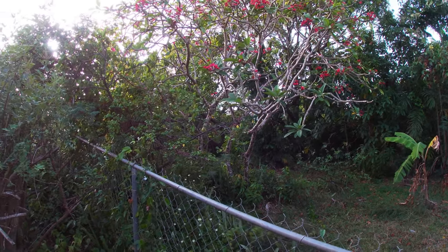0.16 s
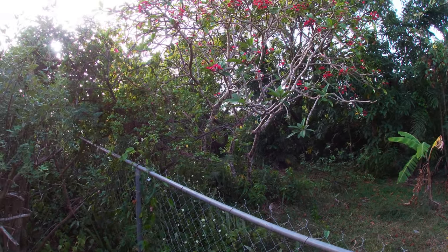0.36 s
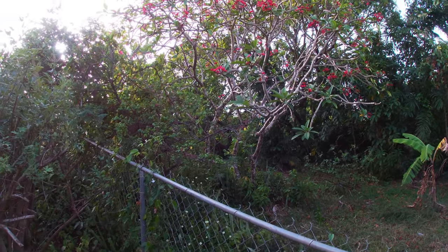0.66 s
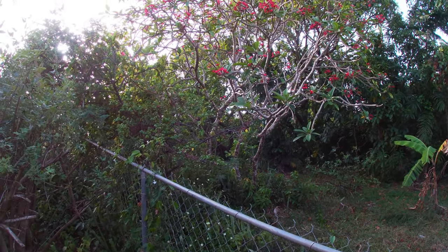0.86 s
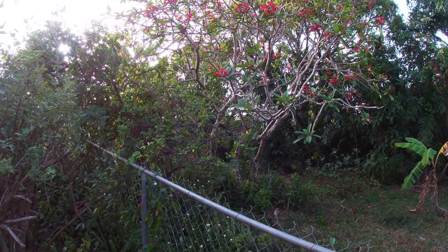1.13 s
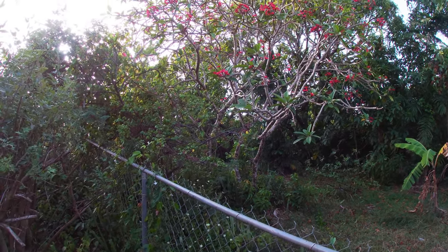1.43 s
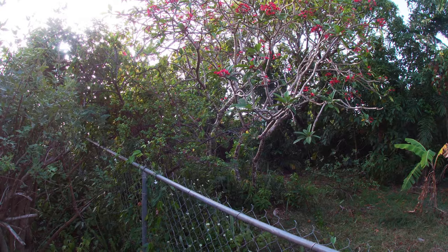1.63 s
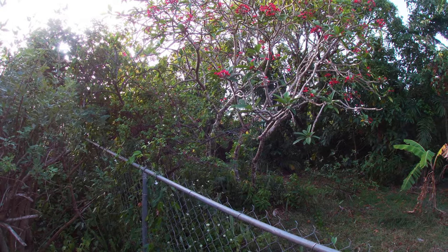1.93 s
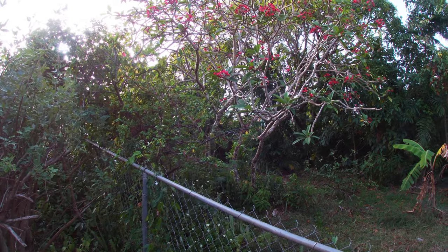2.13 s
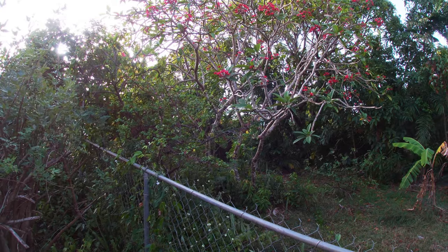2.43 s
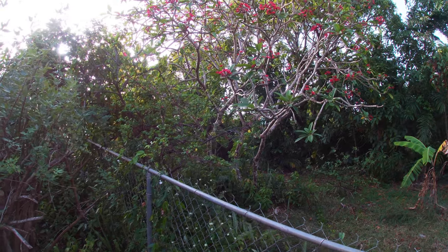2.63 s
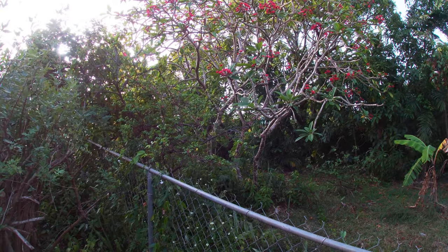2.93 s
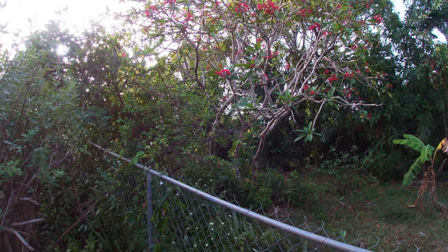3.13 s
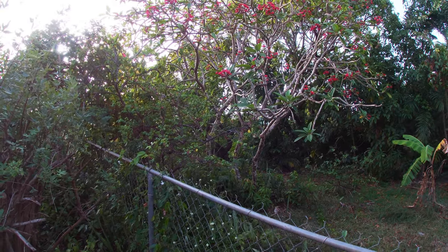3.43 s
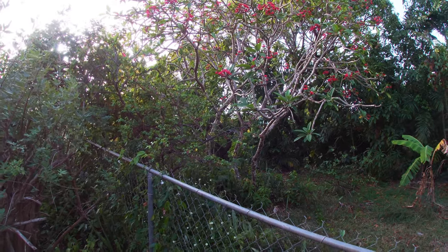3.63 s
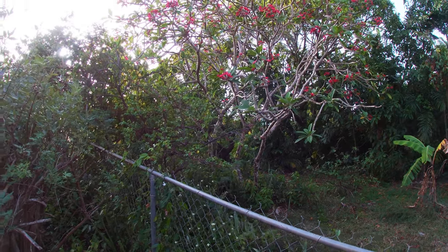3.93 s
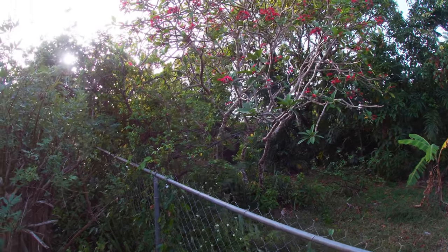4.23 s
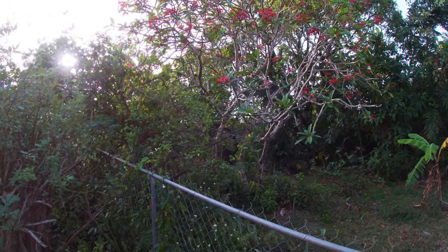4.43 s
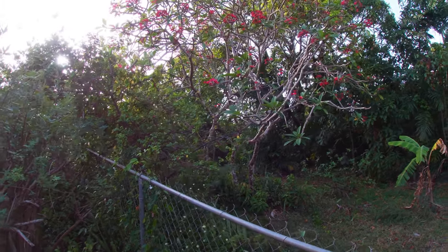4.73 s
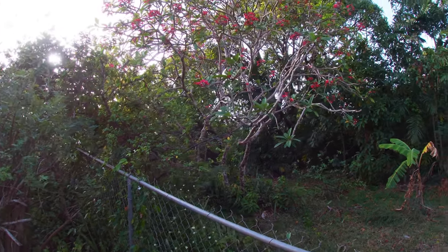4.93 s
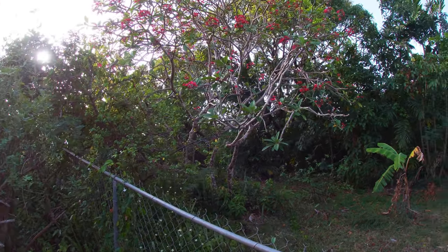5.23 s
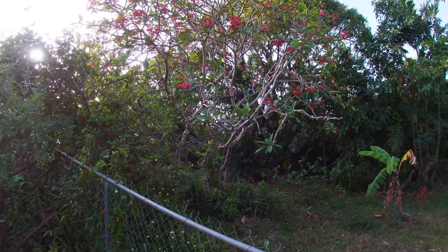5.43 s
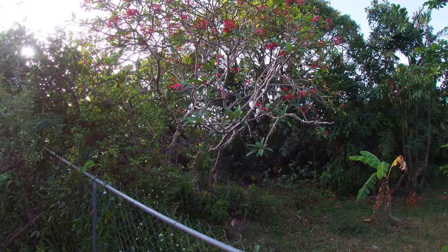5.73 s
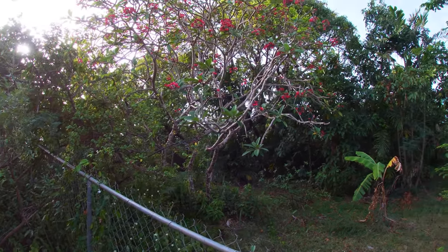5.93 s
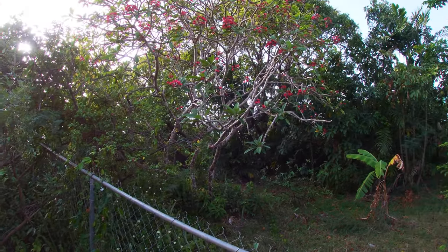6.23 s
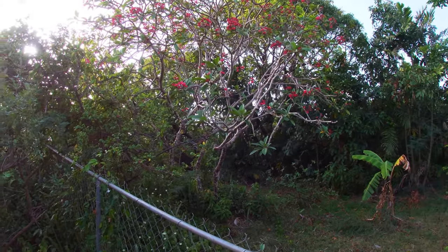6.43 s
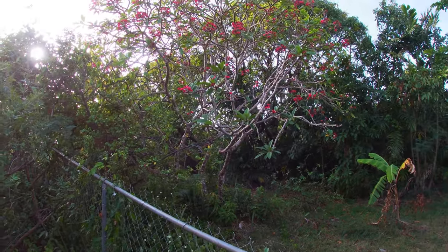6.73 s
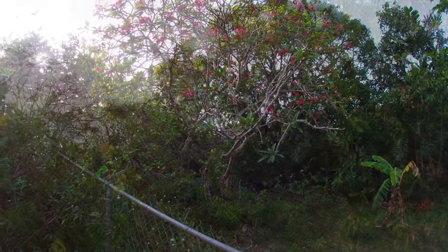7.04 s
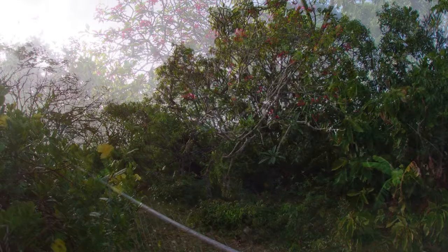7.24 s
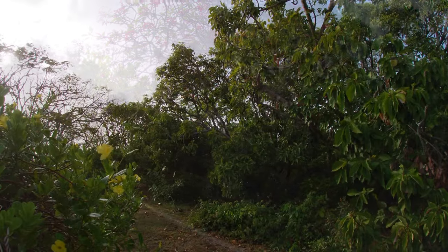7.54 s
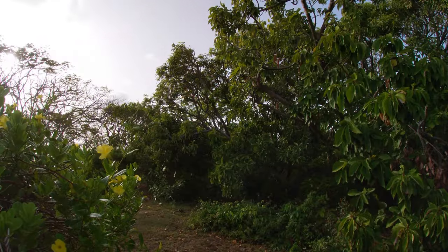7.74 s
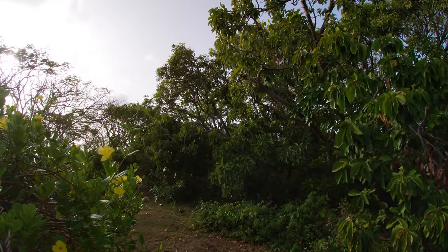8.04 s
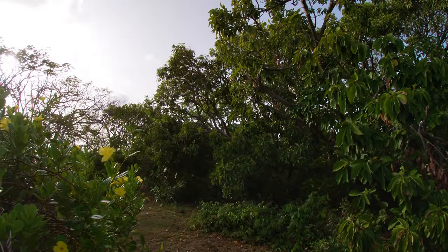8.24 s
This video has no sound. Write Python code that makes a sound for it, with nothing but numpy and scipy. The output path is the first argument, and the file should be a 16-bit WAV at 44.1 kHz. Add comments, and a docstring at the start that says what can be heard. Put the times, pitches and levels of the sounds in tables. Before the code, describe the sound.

Outdoors among trees, short raspy monkey barks come in rapid, uneven bursts with a light echo, over a quiet rush of air. Five sharp chirps from a second animal sound closer to the microphone, and a few soft low bumps lie underneath. Leaves shake and the wind swells as the scolding thins, ending with faint thin bird whistles and two far yaps.

```python
"""Over a soft outdoor rush, a monkey scolds from the trees round a garden: volleys of harsh falling barks,
pulses and rasp rung through a closing mouth, at first with hoarse gasps for air between them. A second,
nearer animal cuts in with sharp chirps, and the wall of trees throws the calls back. A few soft low bumps
sound; later shaken branches rustle and the breeze gusts. At the end a small bird whistles
faintly and the scolding thins out to two far yaps."""
import sys
import numpy as np
from scipy import signal
from scipy.fft import rfft, irfft, next_fast_len
from scipy.io import wavfile
from scipy.ndimage import uniform_filter1d, minimum_filter1d, map_coordinates

SR = 44100
rng = np.random.default_rng(int(sys.argv[2]) if len(sys.argv) > 2 else 0)


def log_audio(samples):
    """Write samples as a 16-bit WAV file to the path given in sys.argv[1]."""
    # one column per channel
    frames = np.atleast_2d(samples).T
    # limit to full scale, then quantise
    limited = np.clip(frames, -1, 1)
    pcm = np.round(limited * 32767).astype(np.int16)
    wavfile.write(sys.argv[1], SR, pcm)


N = 369116
T = np.arange(SR // 5) / SR  # time axis of one short sound, s


def amp(db):
    """Decibels to gain."""
    return 10 ** (np.asarray(db) / 20)


def unit(x):
    """Scaled to rms 1."""
    return x / np.sqrt(np.mean(x ** 2) + 1e-20)


def along(points, hz):
    """A curve of (Hz, value) points, read on a log frequency axis."""
    f, v = np.transpose(points)
    return np.interp(np.log(hz + 1), np.log(f + 1), v)


def wobble(rate, size):
    """A smooth random curve, rate knots a second."""
    return map_coordinates(rng.standard_normal(size // 20 + 4), [np.arange(size) * rate / SR], mode="mirror")


def filtered(x, response):
    """x through an EQ whose gain is a function of frequency."""
    m = next_fast_len(len(x) + 4096)
    return irfft(rfft(x, m) * response(np.fft.rfftfreq(m, 1 / SR)), m)[:len(x)]


def coloured(x, spectrum):
    """x shaped by a (Hz, dB) spectrum, at rms 1."""
    return unit(filtered(x, lambda hz: amp(along(spectrum, hz))))


def resonance(x, centre, width):
    """x through a steep-sided resonance (centre and width in Hz), at rms 1."""
    return unit(filtered(x, lambda f: (1j * f * width / (centre ** 2 - f * f + 1j * f * width)) ** 2))


def swell(length, rise, fall):
    """Envelope of one short sound: opens, holds, closes."""
    attack = np.sin(np.pi / 2 * np.clip(T / rise, 0, 1))
    release = np.cos(np.pi / 2 * np.clip((T - length) / fall + .5, 0, 1)) ** 2
    return attack * release


def surges(rows):
    """Summed power of swells that grow to a peak and die away."""
    t = np.arange(N) / SR
    return sum((amp(db) * np.exp(-np.maximum((s - t) / rise, (t - s) / fall))) ** 2
               for s, rise, fall, db in rows)


def add(track, s, sound):
    """Mix a sound into the track at time s."""
    part = track[max(round(s * SR), 0):][:len(sound)]
    part += sound[:len(part)]


def breeze_and_leaves():
    """A low rush swells in gusts; leaves rustle in tiny clumps, stirred by it or shaken with a branch."""
    # gusts of the breeze: peak_s, rise_s, fall_s, level_db
    gusts = [(0, .5, 1.2, -39.5), (6.2, 0.63, 0.27, -29.5), (7.75, 0.38, 2.2, -34.5)]
    # shaken branches: peak_s, rise_s, fall_s, level_db
    shakes = [(5.1, 0.76, 0.37, -35), (5.82, 0.17, 0.3, -25), (6.45, 0.16, 0.3, -29)]
    # colour of the rush: frequency_hz, density_db
    rush_spectrum = [(30, -13), (100, -22), (155, 0), (220, 0.5), (360, -8), (650, -5.5), (1050, -2),
                     (1300, 3), (1650, -25.5), (2300, -17.5), (3200, -25), (4200, -21), (6000, -40.5),
                     (9000, -55)]
    # colour of the leaves: frequency_hz, density_db
    leaf_spectrum = [(300, -9), (1200, 5.5), (2400, 12.5), (3500, 4), (5200, 2.5), (7000, 0.5), (8500, -9),
                     (10200, -6), (12000, -18), (14500, -28)]
    calm_db, leaf_stir_db = -38, -6.5  # the bed under the gusts; stirred leaves relative to the rush
    breeze_level = np.sqrt(amp(calm_db) ** 2 + surges(gusts))
    leaf_level = np.sqrt((amp(leaf_stir_db) * breeze_level) ** 2 + surges(shakes))
    drift = lambda rate: amp(.8 * wobble(rate, N))
    rush = breeze_level * drift(7) * coloured(rng.standard_normal(N), rush_spectrum)
    clumps = rng.standard_normal(N) * amp(1.5 * wobble(400, N))
    return rush + leaf_level * drift(8.9) * coloured(clumps, leaf_spectrum)


def thuds():
    """Soft low bumps, each a short swell of narrow-band noise."""
    # bumps: start_s, length_s, pitch_hz, level_db
    bumps = [(2.3, .06, 85, -48), (3.815, 0.046, 185, -31.5), (5.43, .04, 181, -35),
             (6.094, 0.13, 218, -42), (6.28, 0.21, 111, -43)]
    out = np.zeros(N)
    for s, length, hz, db in bumps:
        body = resonance(rng.standard_normal(len(T)), hz, 99)
        add(out, s, amp(db) * swell(length, 0.011, 0.038) * body)
    return out


def bird():
    """A small bird's thin, slightly wavering whistles, most of them arched in pitch."""
    # whistles: start_s, length_s, start_hz, middle_hz, end_hz, level_db
    whistles = [(7.13, .08, 5200, 5500, 5200, -55), (7.41, .08, 7200, 7100, 7000, -55),
                (7.555, .1, 4200, 5200, 4800, -49.5), (8.01, .1, 3800, 4700, 4500, -50)]
    out = np.zeros(N)
    for s, length, start_hz, middle_hz, end_hz, db in whistles:
        arch = np.polyfit([0, .5, 1], [start_hz, middle_hz, end_hz], 2)
        pitch = np.polyval(arch, np.clip(T / length, 0, 1)) * (1 + 0.016 * wobble(224, len(T)))
        tone = unit(np.sin(2 * np.pi * np.cumsum(pitch) / SR))
        add(out, s, amp(db) * swell(length, 0.018, 0.024) * tone)
    return out


def scatter(x, decay, delay_s):
    """Echoes from trunks and foliage, drifting smoothly from one pattern to the next."""
    out, hop = np.zeros(N), SR // 3
    fade = np.sin(np.pi * np.arange(2 * hop) / (2 * hop))
    for start in range(-hop, N, hop):
        hz, t, noise = signal.stft(rng.standard_normal(SR * 3 // 4), SR, nperseg=256)
        tail = signal.istft(noise * amp(-60 * t / along(decay, hz)[:, None]), SR, nperseg=256)[1]
        tail = tail / np.sqrt(SR * along(decay, 2000) / np.log(1e6))  # a longer tail adds no energy
        first = max(start, 0)
        part = x[first:start + 2 * hop]
        add(out, first / SR + delay_s, signal.fftconvolve(part * fade[first - start:][:len(part)], tail))
    return out


def tree_echoes(near_send, far_send):
    """A short tail from the near trees, a long one from the far trees, a slap from the garden's edge."""
    # decay among the near trees: frequency_hz, t60_s
    near_decay = [(200, 0.053), (1200, 0.23), (2300, 0.22), (8000, 0.34)]
    # decay among the far trees: frequency_hz, t60_s
    far_decay = [(200, 1), (1200, 0.84), (2300, 1), (4000, 0.2), (9000, 0.19)]
    # colour of the distinct echo from the far edge: frequency_hz, gain_db
    slap_eq = [(250, -24.5), (700, -31), (1300, -25), (2100, -12.5), (2600, -43), (6000, -28)]
    echoes = amp(-5.0) * scatter(near_send, near_decay, delay_s=.012)
    echoes += amp(-15.5) * scatter(far_send, far_decay, delay_s=.05)
    add(echoes, .142, filtered(far_send, lambda hz: amp(along(slap_eq, hz))))
    return echoes


def chirps():
    """A rough squeak drops onto the mouth resonance and ends in a gulp; a reflection doubles it."""
    # the second animal's chirps: start_s, level_db, roughness (0-1), overtone_db (relative)
    calls = [(.404, -12, .62, 0), (2.126, -12.5, .48, -7), (3.12, -10, .45, -5), (4.769, -6.5, .3, 0),
             (5.613, -10, .55, 2)]
    # hoarse part of a chirp: frequency_hz, density_db
    hoarse_spectrum = [(900, -56), (1600, -12.5), (1950, -23), (2250, 6.5), (2800, -8), (3200, -28.5),
                       (3750, -10.5), (4250, -21), (5000, -16), (5700, -31.5), (7300, -25), (10000, -57)]
    pitch = 2402 * (.97 + 0.231 * np.exp(-T / 0.00324))
    out = np.zeros(N)
    for s, db, rough, overtone_db in calls:
        treble_shelf = [(3000, 0), (3700, overtone_db)]
        for delay_s in [0, .0195]:
            phase = 2 * np.pi * np.cumsum(pitch * (1 + 0.19 * rough * wobble(1340, len(T)))) / SR
            tone = unit(np.sin(phase) + amp(-30.5) * np.sin(2 * phase))
            hoarse = coloured(rng.standard_normal(len(T)), hoarse_spectrum)
            squeak = filtered((1 - rough) * tone + rough * hoarse, lambda hz: amp(along(treble_shelf, hz)))
            add(out, s + delay_s, amp(db) * swell(.0115, .003, .009) * unit(squeak))
            gulp = swell(0.0077, 0.0063, 0.011) * resonance(rng.standard_normal(len(T)), 1307, 200)
            add(out, s + delay_s + .007, amp(db + overtone_db - 9) * gulp)
    return out


def gasps():
    """After some barks the monkey draws air through its narrowed throat: a hoarse arched hoot."""
    # in-breaths: start_s, level_db
    breaths = [(.181, -11.5), (.328, -12), (.826, -17.5), (1.008, -21.5), (1.638, -22.5), (3.634, -23)]
    length_s = 0.0308
    arch = 1 - 0.14 * (np.clip(T / length_s, 0, 1.1) - .4) ** 2
    out = np.zeros(N)
    for s, db in breaths:
        pitch = 1295 * arch * (1 + 0.0055 * wobble(360, len(T)))
        hoot = np.sin(2 * np.pi * np.cumsum(pitch) / SR)
        hoarse = .5 * resonance(rng.standard_normal(len(T)), 1240, 280)
        hoarse += 0.19 * resonance(rng.standard_normal(len(T)), 268, 210)
        add(out, s, amp(db) * swell(length_s, 0.0073, 0.024) * (hoot + hoarse))
    return out


def bark(length, start_hz, end_hz, db, harsh_db, closure, catch_s, ringing, chest_db):
    """The pitch sags and the mouth closes as the air runs out; a ringing start breaks up into rasp."""
    # colour of the rasp: frequency_hz, density_db
    rasp_spectrum = [(120, -55), (300, -36), (450, -12), (800, -4), (1100, -7.5), (1500, 0), (2000, -2),
                     (2600, 0.5), (3100, -5), (3700, -7), (4600, -16), (7000, -24.5), (10000, -41),
                     (15000, -53)]
    # lowest harmonics, the chest of the voice: multiple, level_db
    chest_harmonics = [(1, 0), (2, -3), (3, -3), (4, -33)]
    progress = np.clip(T / length, 0, 1.15)
    unsteady = 1 + .011 * wobble(504, len(T)) + .017 * wobble(70.6, len(T))  # fast jitter, slow waver
    pitch = (start_hz + (end_hz - start_hz) * progress ** 1.25) * unsteady
    phase = 2 * np.pi * np.cumsum(pitch) / SR
    pulses = unit(np.cos(np.outer(np.arange(1, 19), phase) + rng.uniform(0, np.pi, (18, 1))).sum(0))
    puffs = lambda: unit(rng.standard_normal(len(T)) * (1 + 0.27 * np.cos(phase)))  # air, once a cycle
    voice = lambda hz, width: unit(resonance(pulses, hz, width) + .45 * resonance(puffs(), hz, width))
    closing = np.pi / 2 * np.clip((progress - .3) / 0.79, 0, 1)

    def slide(hz, width, drop):
        """A resonance crossfades into a lower, wider, weaker one."""
        return np.cos(closing) * voice(hz, width) + 0.52 * np.sin(closing) * voice(hz * drop, width * 1.44)

    strain = amp(harsh_db)  # a harsher bark blurs the mouth resonance and drags it lower
    mouth = slide(2246 - 13.5 * harsh_db, width=430 * strain, drop=1 - closure * strain)
    throat = amp(harsh_db - 2.5) * slide(1192, width=250, drop=0.841)
    grit = unit(coloured(puffs(), rasp_spectrum) + 1.1 * coloured(pulses, rasp_spectrum))
    rasp = amp(harsh_db - 2.5 - 10 * ringing * np.clip(1 - progress / 0.51, 0, 1)) * grit
    chest = sum(amp(level) * np.sin(k * phase + rng.uniform(0, 2 * np.pi)) for k, level in chest_harmonics)
    push = amp(-7 * np.clip((catch_s - T) / 0.0066, 0, 1))  # catches weakly, then jumps to full strength
    upper = push * swell(length, 0.0011, 0.037) * (mouth + throat + rasp)
    return amp(db) * (upper + amp(chest_db) * swell(length, catch_s + 0.013, 0.051) * chest)


def scolding_monkey():
    """Near volleys, each bark pitched by the rest before it and the haste of the next; then far yaps."""
    # barks: start_s, length_s, level_db, harshness_db (rasp and throat against the mouth resonance)
    volleys = [(0, 0.025, -5.5, 0.5), (0.094, 0.061, -12, 0), (0.251, 0.053, -15.5, 4),
               (0.543, 0.063, -9.5, 0.5), (0.599, 0.065, -11, 1.5), (.733, .052, -13.5, 0),
               (0.918, 0.044, -10, -1.5), (1.118, 0.053, -10, -3), (1.316, .055, -11, -1),
               (1.414, 0.058, -9.5, -2.5), (1.551, 0.04, -10, -3), (1.754, 0.045, -10, -2),
               (1.901, 0.049, -10.5, -3), (2.334, .083, -10.5, -3), (2.403, 0.08, -9, -1),
               (2.492, 0.059, -9.5, 0), (2.847, 0.062, -10.5, -3.5), (2.95, 0.057, -9.5, -3),
               (3.221, 0.07, -11.5, -2.5), (3.283, 0.073, -9, -2.5), (3.392, 0.059, -9.5, -3),
               (3.539, .05, -10.5, -3.5), (3.712, .059, -12.5, -1.5), (4.255, .06, -12.5, -0.5),
               (4.34, .064, -7.5, -4.5), (4.444, 0.062, -9, -3.5), (4.965, 0.064, -12.5, -3),
               (5.026, 0.062, -10, -0.5), (5.141, 0.059, -12, -2), (5.785, 0.055, -12.5, 0),
               (5.842, 0.072, -9, -2), (5.98, 0.053, -15.5, 0), (6.293, .068, -13, -2),
               (6.409, 0.067, -11, -0.5), (6.492, .072, -13.5, 0)]
    # abrupt far yaps, fairly clear and with more chest than a bark: start_s, level_db
    yaps = [(7.452, -23.5), (8.176, -19.5)]
    slack_hz_per_s, full_rest_s = 140, 0.51  # the longer the rest before a bark, the lower it starts
    run_on_s = .075  # a bark that runs on into the next one falls less far in pitch
    closing_per_s, tiring_per_s = 1.0, 0.26  # the mouth resonance sinks faster as the monkey tires
    out = np.zeros(N)
    gaps = np.diff([-np.inf, *np.transpose(volleys)[0], np.inf])
    for (s, length, db, harsh_db), before, after in zip(volleys, gaps, gaps[1:]):
        rest = min(before, full_rest_s)
        alarm = 1 + .12 * np.exp(-s / 1.202)  # the first alarm raises the pitch, then fades
        start_hz = alarm * (381.4 - slack_hz_per_s * rest)
        end_hz = alarm * (285 if after < run_on_s else 225.65)
        closure = closing_per_s * length * (1 + tiring_per_s * s)
        catch_s = 0.013 + 0.0055 * rest  # the weak start lasts longer after a rest
        add(out, s, bark(length, start_hz, end_hz, db, harsh_db, closure, catch_s,
                         ringing=.52, chest_db=-12))
    for s, db in yaps:
        add(out, s, bark(length=.034, start_hz=250, end_hz=200, db=db, harsh_db=-2.5,
                         closure=0.17, catch_s=.001, ringing=0, chest_db=-8.5))
    return out


def scene():
    """Calls, echoes and garden air; the chirping animal is nearer, so the far trees answer it less."""
    tree_calls = scolding_monkey() + gasps() + bird()
    near_chirps = chirps()
    calls = tree_calls + near_chirps
    echoes = tree_echoes(near_send=calls, far_send=tree_calls + amp(-2.5) * near_chirps)
    return (amp(-3.5) * calls + echoes + thuds() + breeze_and_leaves())[None]


def record(dry):
    """A low cut takes out the deep bass, a limiter holds the highest peaks, a steep high cut follows."""
    low_cut_hz, ceiling, high_cut_hz = 65, .95, 14400
    x = filtered(dry[0], lambda hz: hz ** 2 / (hz ** 2 + low_cut_hz ** 2))
    needed_gain = np.minimum(1, ceiling / (np.abs(x) + 1e-9))
    gain = uniform_filter1d(minimum_filter1d(needed_gain, size=301), size=301)
    return filtered(x * gain, lambda hz: hz < high_cut_hz)[None]


dry = scene()
out = record(dry)
log_audio(out)
```